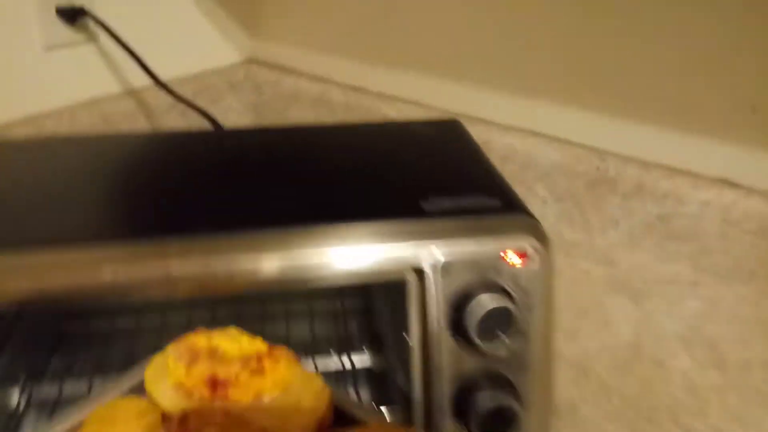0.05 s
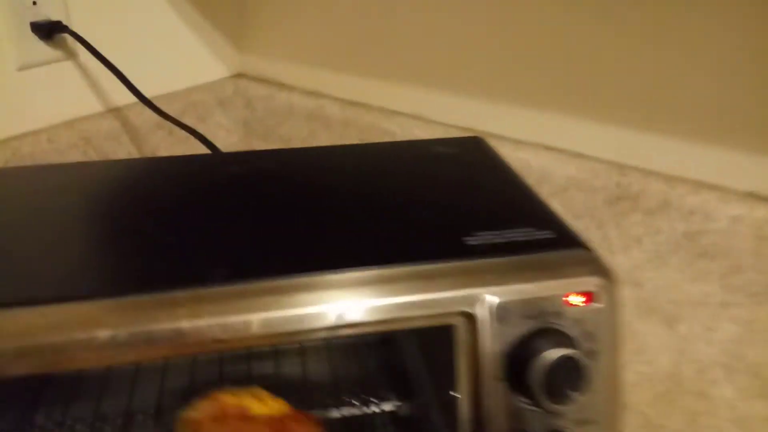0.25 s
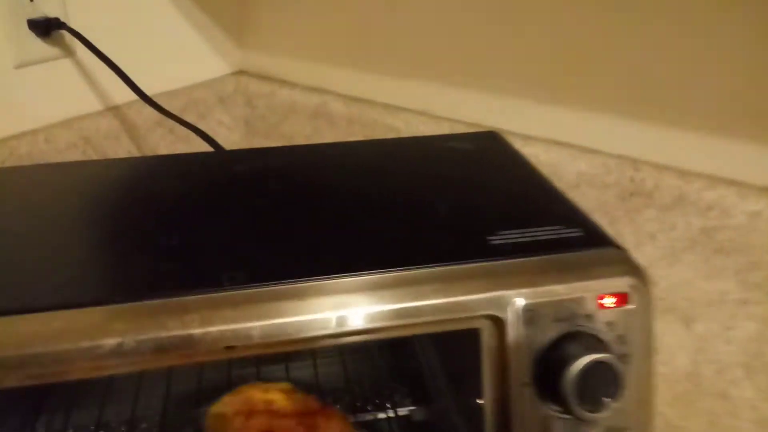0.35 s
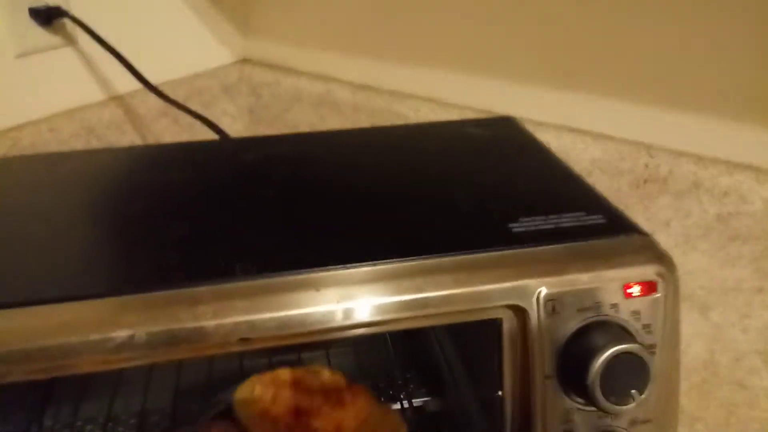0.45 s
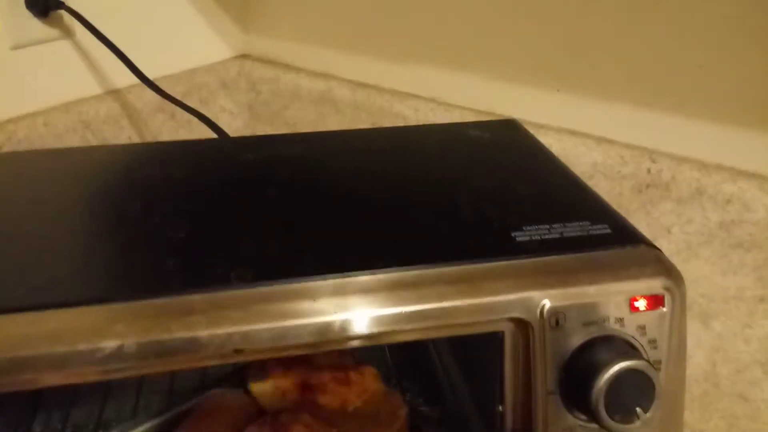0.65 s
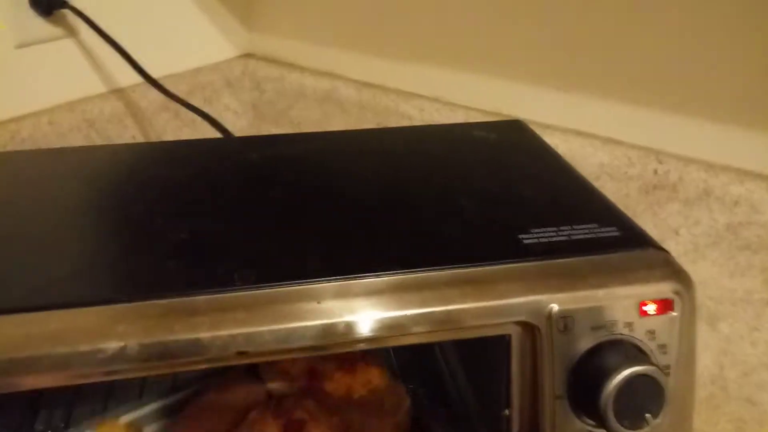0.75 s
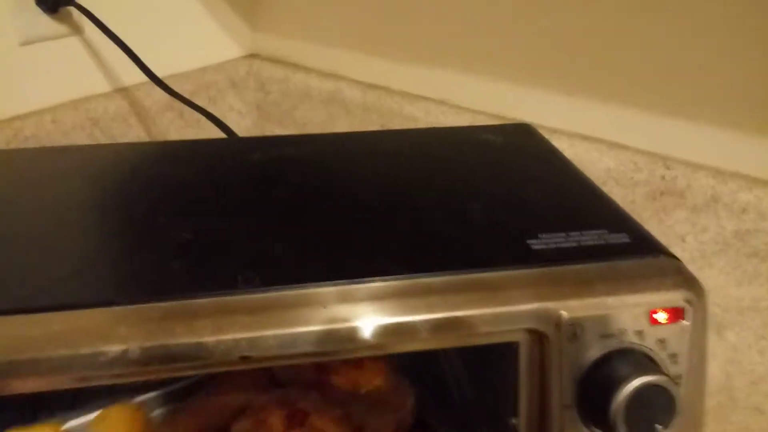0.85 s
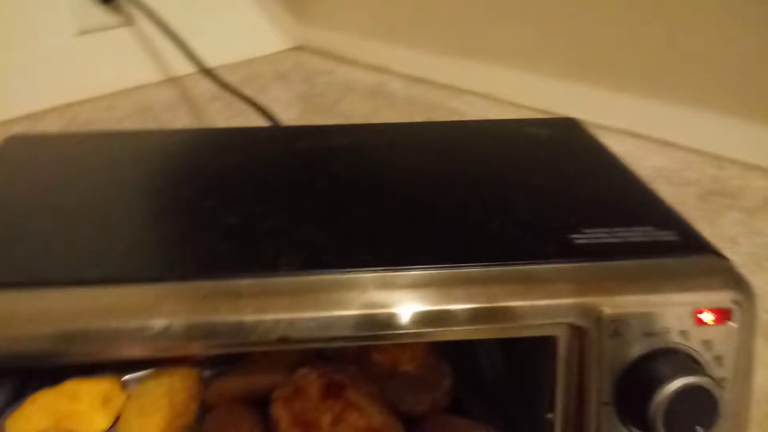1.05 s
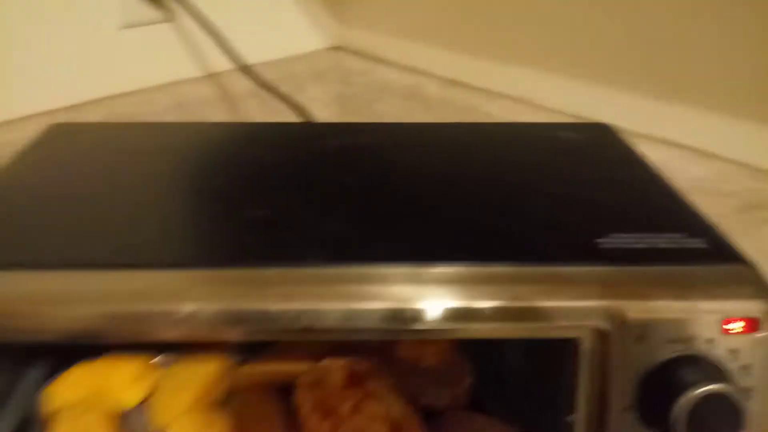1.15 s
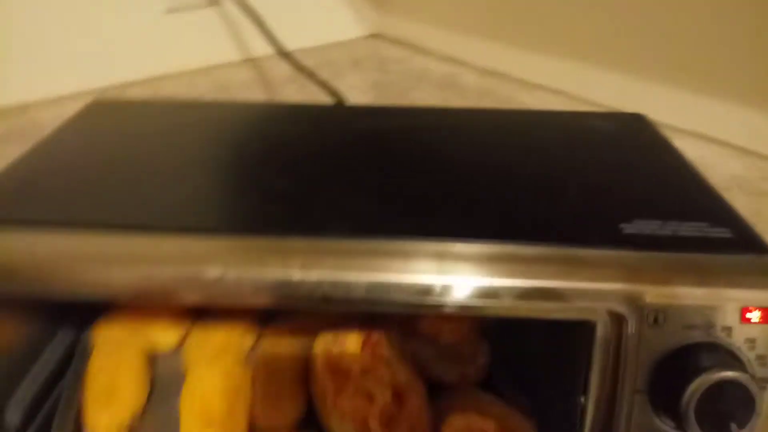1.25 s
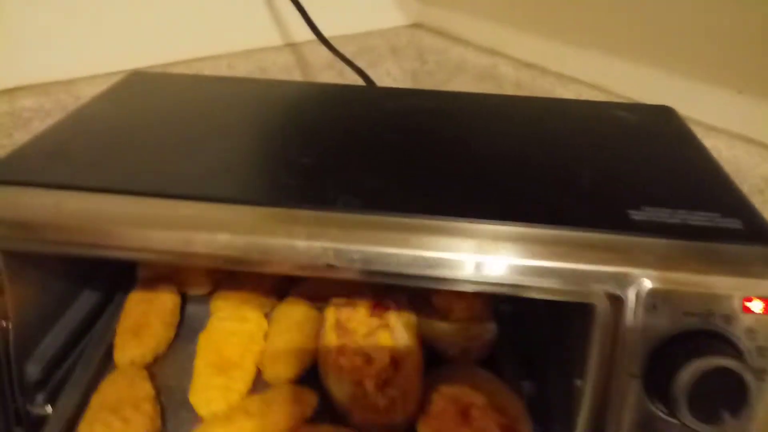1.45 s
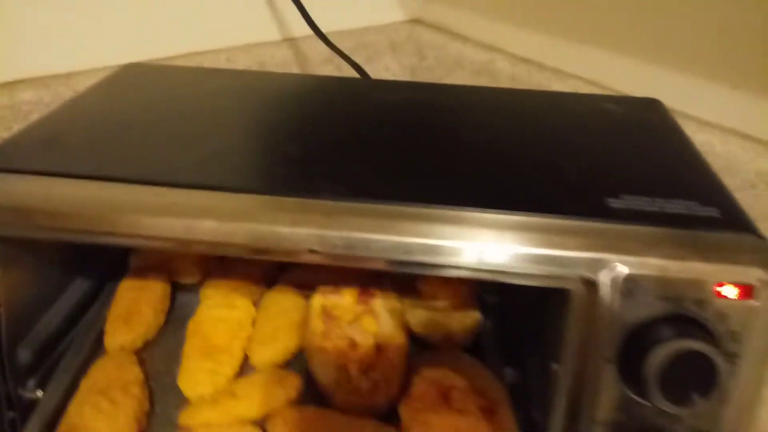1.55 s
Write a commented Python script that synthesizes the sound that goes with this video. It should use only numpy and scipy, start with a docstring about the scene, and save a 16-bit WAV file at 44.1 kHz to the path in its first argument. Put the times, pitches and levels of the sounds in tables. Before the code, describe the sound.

A thin metal tray is pushed onto a small oven's wire rack: faint ticks, a quick burst of bright clatter and scraping, a second cluster of knocks, then soft rubbing; close microphone, quiet room.

```python
"""Quiet-room noise runs throughout; wires and panels soon ring as beating pairs of decaying sines.
A sheet-metal tray is pushed onto the wire rack of a small oven: it rubs along the wires as random grains,
then knocks as blows with dying chatter; both excite dense modes of tray and oven and a few clear ones.
From 0.5 s the rubbing at times hums as the tray sticks and slips: a wavering tone and one about an octave below."""
import sys
import numpy as np
from scipy import signal
from scipy.fft import rfft, irfft
from scipy.io import wavfile

SR = 44100
rng = np.random.default_rng(int(sys.argv[2]) if len(sys.argv) > 2 else 0)


def transcribe(signal):
    """Save signal, clipped to [-1, 1], as a 16-bit WAV file at the path in sys.argv[1]."""
    frames = np.atleast_2d(signal).T
    limited = np.clip(frames, -1, 1)
    pcm = np.round(limited * 32767).astype(np.int16)
    wavfile.write(sys.argv[1], SR, pcm)


def makeup_ratio(level_db):
    """Linear amplitude ratio for a level in decibels (20 dB per factor of ten)."""
    decades = np.asarray(level_db, float) / 20
    return 10 ** decades


N = 70560

# room noise colour: hz, relative_db_per_hz
ROOM_COLOUR = [(30, -25), (200, -26), (270, -13), (330, 7.5), (420, -13), (630, -2), (1060, -6.5),
               (1610, -3.5), (2040, -12), (4000, -23.5), (6500, -15.5), (9500, -20.5), (12000, -43),
               (15300, -30), (16000, -60)]
ROOM_RMS_DB = -63.5

# wires and panels set ringing in passing: start_s, pitch_hz, peak_db (of the main sine, before rise and decay), t60_s
PLUCKS = [(0.0688, 1744, -38.5, 0.036), (0.069, 2250, -44, 0.029), (0.069, 3400, -51, 0.012),
          (0.069, 4330, -54, .012), (0.1275, 2920, -46, .015), (0.11, 1640, -52, .08),
          (.128, 1900, -38, 0.032), (0.136, 1298, -40.5, 0.087), (.141, 636, -50, .15),
          (.156, 1240, -48, 0.11), (.160, 602, -48, 0.16), (.186, 1263, -52, .12), (.486, 1635, -24, 0.11),
          (.488, 602, -32, 0.21), (0.664, 2990, -36.5, .08), (.871, 226.2, -27, 0.29), (.878, 651, -31, .2),
          (.895, 370, -28.5, 0.36), (.945, 517, -35, 0.34), (.95, 903, -37, 0.47), (1.097, 1280, -48, 0.15),
          (1.402, 1060, -43, 0.16), (1.411, 1582, -40.5, 0.073), (1.414, 2430, -51.5, 0.08),
          (1.481, 2390, -52.5, .08)]
PLUCK_RISE_S, PLUCK_PAIR_RATIO = 0.00084, 1.045

# rubbing drive: time_s, treble_db, bass_db, low_mid_db, mid_db, high_mid_db
RUB_LEVELS = [(0.09, -72, -88, -88.5, -73, -65.5), (0.16, -75, -81, -72, -70, -87),
              (0.216, -73, -56, -51, -62, -63.5), (0.274, -61, -74, -49, -39, -59),
              (0.32, -56, -66, -45, -33, -49), (0.362, -56, -50, -46, -32, -43),
              (0.4, -50, -43.5, -39, -39, -38), (0.492, -71, -38, -54, -55, -68),
              (0.624, -53.5, -51.5, -49, -44, -54.5), (0.708, -57.5, -51.5, -55, -47, -60),
              (0.9, -51.5, -48, -37.5, -51.5, -48), (1.026, -59, -42.5, -49, -45, -59),
              (1.106, -53.5, -52.5, -54, -51, -56.5), (1.238, -53, -56, -49, -51.5, -59.5),
              (1.364, -71.5, -58, -61.5, -68, -76), (1.472, -66, -68.5, -58, -63, -71),
              (1.6, -62.5, -53.5, -50.5, -54.5, -64)]
RUB_START_S, RUB_GRAINS_PER_S, RUB_SPREAD_DB = 0.09, 1500, 3.5
RUB_LUMP_DB, RUB_LUMP_HZ = 1.5, 24.6

# knocks: start_s, treble_db, bass_db, low_mid_db, mid_db, high_mid_db (before register gain), chatter_decay_s
KNOCKS = [(0.1296, -42.5, -82, -78, -47, -52.5, 0.011), (0.1352, -45.5, -90, -53.5, -47.5, -57, 0.0046),
          (0.2209, -16.5, -32, -22, -19.5, -26, 0.012), (0.2431, -20.5, -26.5, -24, -28.5, -28, 0.015),
          (0.2782, -24.5, -29, -26.5, -26, -32, 0.011), (0.3188, -18, -30.5, -30, -26, -26.5, 0.012),
          (0.3296, -21.5, -35.5, -30, -31.5, -33.5, 0.012), (0.381, -22.5, -33.5, -30, -28.5, -33, 0.011),
          (0.4266, -26.5, -43, -36, -50, -41, 0.0072), (0.483, -19, -32.5, -30.5, -25.5, -25.5, 0.0045),
          (0.6384, -30, -47, -44, -42.5, -43.5, 0.014), (0.663, -26.5, -41, -43, -38, -30.5, 0.01),
          (0.86, -34, -45, -46, -43, -41, 0.012), (0.858, -25, -42, -46, -36, -37.5, 0.0086),
          (0.8684, -15, -31.5, -27, -22.5, -25.5, 0.012), (0.895, -26, -26, -31, -26.5, -30, 0.011),
          (0.9407, -21.5, -39, -35.5, -29.5, -32, 0.016), (0.9834, -28.5, -42, -38, -38, -40, 0.0061),
          (1.0018, -20.5, -42, -37, -28.5, -34, 0.0054), (1.0117, -30.5, -34, -45, -42, -39.5, 0.013),
          (1.0918, -31, -39.5, -48, -48, -45.5, 0.0095), (1.1529, -37, -54, -45, -45, -48.5, 0.0087),
          (1.2566, -48, -46.5, -47.5, -53.5, -50, 0.012), (1.4011, -38, -58, -68, -48, -51, 0.0074),
          (1.416, -37.5, -55, -60.5, -44.5, -49.5, 0.0076), (1.478, -38.5, -72, -64, -52.5, -52.5, 0.0074)]
CHATTER_GRAINS_PER_S, CHATTER_SPREAD_DB, FIRST_BLOW_DB = 2500, 4, 18

# sheet registers, in the order of the level columns above: low_hz, high_hz, rise_s, knock_gain_db
REGISTERS = [(3378, 17000, 0.00021, -7), (60.4, 420, 0.0055, 2), (418.1, 900, 0.00098, 2),
             (900.5, 1700, 0.0014, 1), (1700, 3400, 0.00065, 1)]
# colour of tray and oven: hz, relative_db_per_hz
SHEET_COLOUR = [(45, -24), (100, -7), (150, -12), (225, -0.5), (265, -9.5), (370, 0), (430, -16.5),
                (540, -5.5), (820, -12), (1400, -9.5), (1900, -11.5), (2900, -12.5), (3500, -26.5),
                (5200, -25), (6500, -16.5), (8500, -18.5), (10500, -30), (13500, -34), (15300, -27),
                (15800, -27), (16100, -48), (17000, -52)]
# ring time of the sheet, before random scaling per mode: hz, t60_s
SHEET_T60 = [(60, 0.16), (260, 0.22), (700, 0.23), (1800, 0.18), (4800, 0.18), (12000, 0.13)]
MODE_GAP_HZ, SPOTS = 11, 4
CRACK_DB, CRACK_DECAY_S = 3, 0.0024

# clear modes of tray and rack: hz, relative_db, t60_s
CLEAR_MODES = [(101, -8, 0.16), (208, -2.5, 0.23), (235.2, 9, 0.2), (297, -5.5, 0.91), (336, -14, 0.43),
               (370, -12, 0.085), (529.6, -11, 0.42), (568, -4, 0.12), (650, -21, 0.17), (1290, -25, 0.49),
               (1374, 1.5, 0.23), (1490, -3, 0.18), (1695, -2, 0.21), (2990, 4, 0.051)]
CLEAR_GAIN_DB, CLEAR_SPREAD_DB = -39, 4

# stick-slip hum: time_s, level_db, pitch_hz (sounded at 0.97 and 0.5 of it)
HUM = [(.5, -49, 595), (.56, -45.5, 586.2), (.62, -48.5, 570.7), (.70, -54, 574), (.75, -61, 568),
       (.815, -50.5, 569.7), (.835, -43, 572.8), (.858, -48, 572), (.88, -44, 570), (1.1, -55.5, 576.2),
       (1.2, -56, 582), (1.245, -49.5, 576), (1.3, -60, 570.7), (1.36, -60, 570), (1.5, -68, 576),
       (1.6, -56, 581)]
HUM_WAVER_SPREAD_HZ, HUM_WAVER_RATE_HZ = 3.86, 30
HUM_FLUTTER_DB, HUM_FLUTTER_RATE_HZ, HUM_LOWER_TONE_DB = 2, 13, -6

MIC_LOW_HZ, CUTOFF_HZ = 51, 17100


def rms_one(x):
    """Scale to rms 1."""
    return x / np.sqrt(np.mean(x ** 2) + 1e-20)


def in_time(rows):
    """Interpolate the columns of a time table at every sample."""
    time_s, *columns = np.transpose(rows)
    return np.array([np.interp(np.arange(N) / SR, time_s, c) for c in columns])


def at_hz(points, hz):
    """Interpolate a table on a log-frequency axis."""
    table_hz, values = np.transpose(points)
    return np.interp(np.log(hz), np.log(table_hz), values)


def drift(rate_hz):
    """Slow random wander of rms 1: noise through two equal one-pole low-passes."""
    r = np.exp(-2 * np.pi * rate_hz / SR)
    noise = rng.standard_normal(N + SR)
    return rms_one(signal.lfilter([1], [1, -2 * r, r * r], noise)[SR:])  # drop run-in


def grains(per_s, spread_db):
    """Random tiny contacts of uneven size and either sign; rms 1."""
    size_draw, sign_draw, hit_draw = rng.random((3, N))
    size_db = spread_db * np.minimum(-np.log(size_draw + 1e-9), 4)
    hits = hit_draw < per_s / SR
    return rms_one(makeup_ratio(size_db) * np.sign(sign_draw - 0.5) * hits)


def room():
    """Steady air noise: white noise coloured in frequency."""
    hz = np.maximum(np.fft.rfftfreq(N, 1 / SR), 1)
    spectrum = rfft(rng.standard_normal(N)) * makeup_ratio(at_hz(ROOM_COLOUR, hz))
    return makeup_ratio(ROOM_RMS_DB) * rms_one(irfft(spectrum, N))


def wire():
    """A plucked wire or panel rings as a beating pair of close modes."""
    out = np.zeros(N)
    for start_s, pitch_hz, peak_db, t60_s in PLUCKS:
        t = np.maximum(np.arange(N) / SR - start_s, 0)
        main = np.sin(2 * np.pi * pitch_hz * t)
        partner = 0.5 * np.sin(2 * np.pi * pitch_hz * PLUCK_PAIR_RATIO * t)
        rise = 1 - np.exp(-t / PLUCK_RISE_S)
        out += makeup_ratio(peak_db - 60 * t / t60_s) * rise * (main + partner)
    return out


def rub_drives():
    """Rubbing is a lumpy stream of tiny contacts, with its own level curve per register."""
    touching = np.arange(N) / SR > RUB_START_S
    contacts = grains(RUB_GRAINS_PER_S, RUB_SPREAD_DB)
    lumps = makeup_ratio(RUB_LUMP_DB * drift(RUB_LUMP_HZ))
    return contacts * lumps * touching * makeup_ratio(in_time(RUB_LEVELS))


def knock_drives():
    """Each knock is one firm blow and a chatter that dies away exponentially."""
    knocks = np.array(KNOCKS)
    since_s = np.arange(N) / SR - knocks[:, :1]
    dying = (since_s >= 0) * np.exp(-np.maximum(since_s, 0) / knocks[:, 6:])
    blow = makeup_ratio(FIRST_BLOW_DB) * (since_s < 1 / SR)
    return dying * (grains(CHATTER_GRAINS_PER_S, CHATTER_SPREAD_DB) + blow)


def sheet(low_hz, high_hz, rise_s):
    """Click responses of one register at several spots: dense dying modes led by a crack, energy 1 each."""
    count = max(int((high_hz - low_hz) / MODE_GAP_HZ), 90)
    place, damping = rng.random((count, 2)).T
    hz = low_hz + (high_hz - low_hz) * (np.arange(count) + place) / count
    t60_s = np.clip(at_hz(SHEET_T60, hz) * (0.68 + 1.02 * damping), 0.01, 0.5)
    t = np.arange(int(t60_s.max() * SR * 0.7)) / SR
    modes = np.exp(np.outer(-np.log(1000) / t60_s, t)) * np.sin(np.outer(2 * np.pi * hz, t))
    signs = rng.choice([-1, 1], (SPOTS, count))
    out = (signs * makeup_ratio(at_hz(SHEET_COLOUR, hz)) / np.sqrt(t60_s)) @ modes
    out *= 1 - np.exp(-t / rise_s)
    out *= 1 + makeup_ratio(CRACK_DB) * np.exp(-t / CRACK_DECAY_S)
    high_pass = signal.butter(2, low_hz * 0.8, "high", fs=SR, output="sos")
    out = signal.sosfilt(high_pass, out)
    return out / np.sqrt(np.sum(out ** 2, axis=1, keepdims=True))


def ring(clicks, hz, t60_s):
    """Two-pole resonator: a unit click starts a decaying sine of height 1."""
    r, w = makeup_ratio(-60 / (t60_s * SR)), 2 * np.pi * hz / SR
    return signal.lfilter([0, np.sin(w)], [1, -2 * r * np.cos(w), r * r], clicks + 1e-18)


def tray():
    """Rubbing and knocks land on changing spots of the sheet and drive the clear modes."""
    rub, knocks = rub_drives(), knock_drives()
    levels_db = np.array(KNOCKS)[:, 1:6]
    spot = rng.integers(0, SPOTS, N) == np.arange(SPOTS)[:, None]
    out = np.zeros(N)
    for k, (low_hz, high_hz, rise_s, knock_gain_db) in enumerate(REGISTERS):
        drive = (makeup_ratio(levels_db[:, k] + knock_gain_db) @ knocks + rub[k]) * spot
        out += signal.fftconvolve(drive, sheet(low_hz, high_hz, rise_s), axes=1)[:, :N].sum(axis=0)
    spread = rng.standard_normal((len(KNOCKS), len(CLEAR_MODES)))
    for k, (hz, relative_db, t60_s) in enumerate(CLEAR_MODES):
        # first register holding the mode
        home = [low_hz <= hz < high_hz for low_hz, high_hz, *_ in REGISTERS].index(True)
        gains = makeup_ratio(levels_db[:, home] + CLEAR_SPREAD_DB * spread[:, k])
        out += makeup_ratio(relative_db + CLEAR_GAIN_DB) * ring(gains @ knocks + rub[home], hz, t60_s)
    return out


def hum():
    """Sticking and slipping holds a wavering tone and a lower one, each fluttering in level."""
    level_db, pitch_hz = in_time(HUM)
    wavering_hz = pitch_hz + HUM_WAVER_SPREAD_HZ * drift(HUM_WAVER_RATE_HZ)
    phase = 2 * np.pi * np.cumsum(wavering_hz) / SR
    tones = np.zeros(N)
    for pitch_share, gain_db in ((0.97, 0), (0.5, HUM_LOWER_TONE_DB)):
        flutter_db = HUM_FLUTTER_DB * drift(HUM_FLUTTER_RATE_HZ)
        tones += makeup_ratio(gain_db + flutter_db) * np.sin(pitch_share * phase)
    started = np.arange(N) / SR > HUM[0][0]
    return np.sqrt(2) * tones * makeup_ratio(level_db) * started  # sqrt(2): sine peak from rms


def scene():
    """Room, wires, tray and hum on one microphone."""
    return (room() + wire() + tray() + hum())[None]


def band_limit(x):
    """A steep low-pass at the top of the band."""
    return signal.sosfilt(signal.butter(12, 17140, fs=SR, output="sos"), x)


def record(dry):
    """The microphone loses the deep bass; a steep low-pass cuts the top."""
    high_pass = signal.butter(2, MIC_LOW_HZ, "high", fs=SR, output="sos")
    low_pass = signal.cheby2(10, 50, CUTOFF_HZ, fs=SR, output="sos")
    mix = signal.sosfilt(low_pass, signal.sosfilt(high_pass, dry))
    return band_limit(mix)


dry = scene()
out = record(dry)
transcribe(out)
```